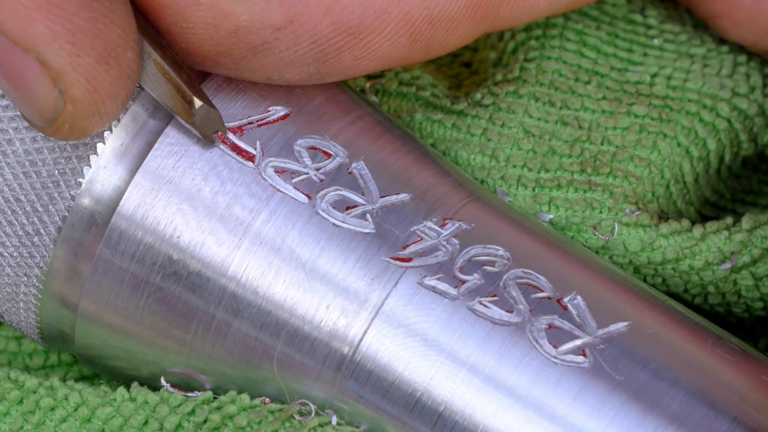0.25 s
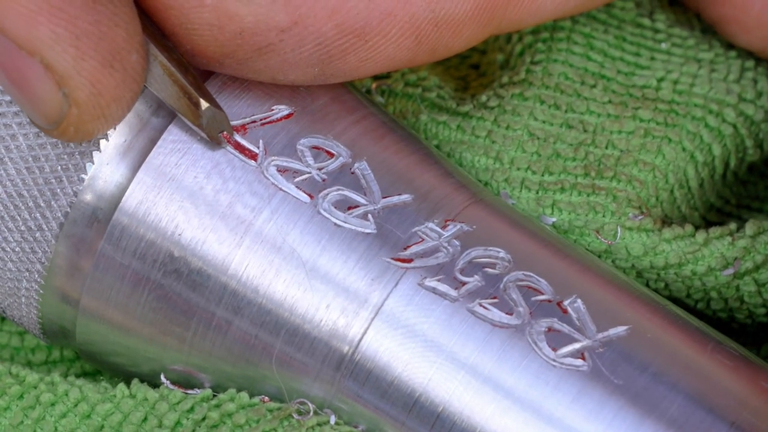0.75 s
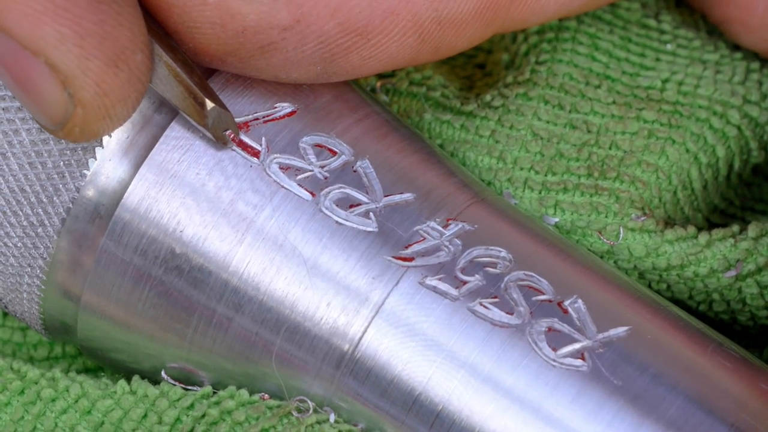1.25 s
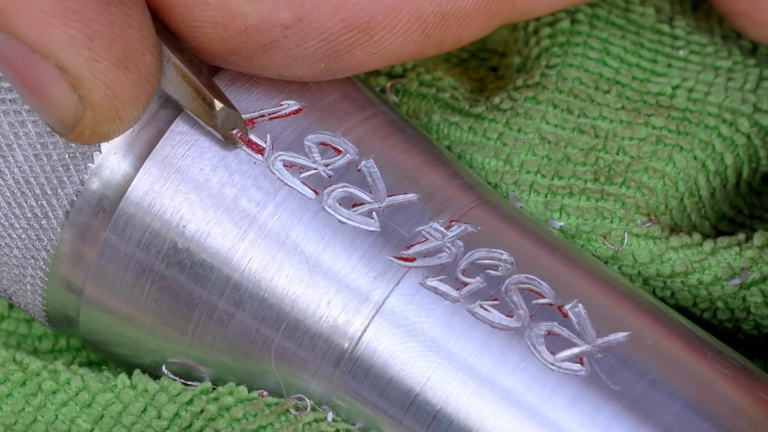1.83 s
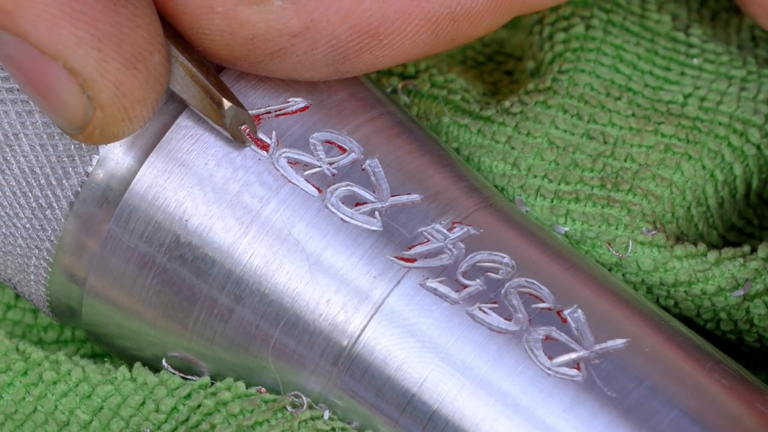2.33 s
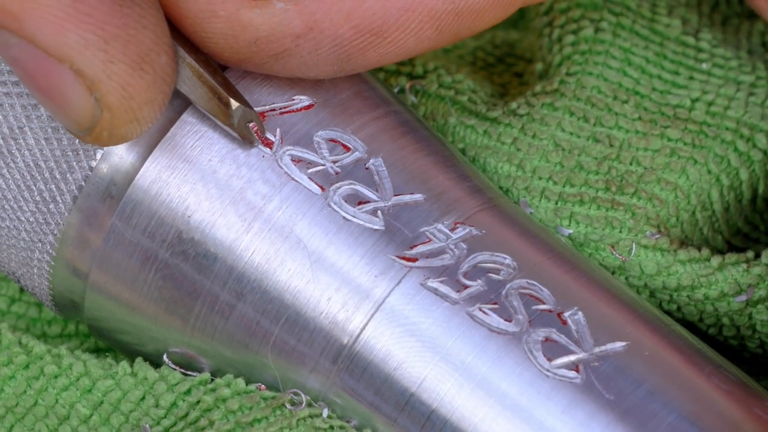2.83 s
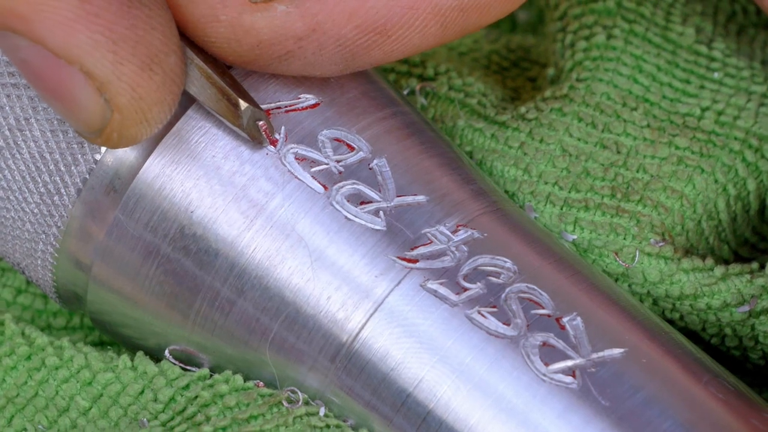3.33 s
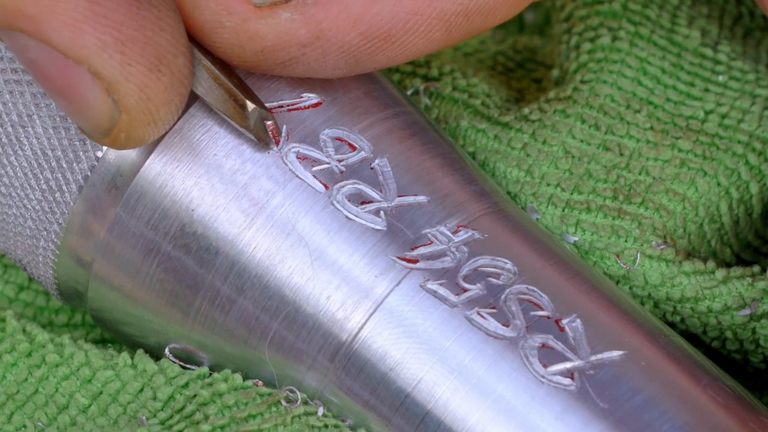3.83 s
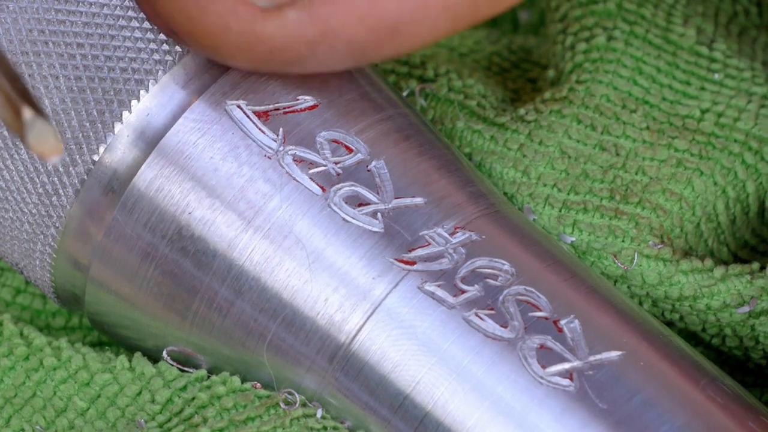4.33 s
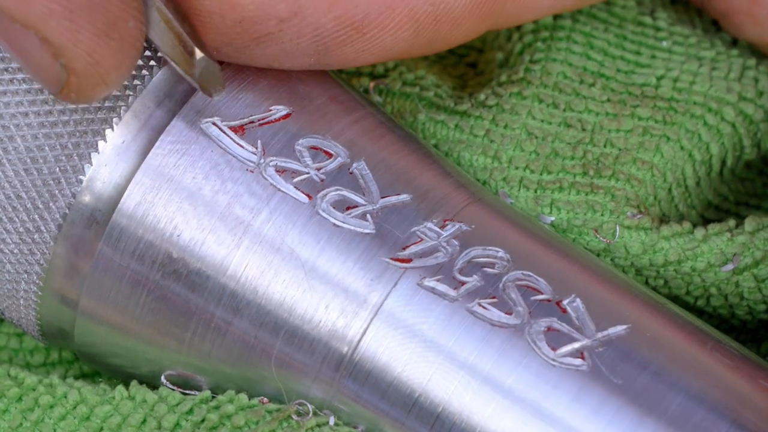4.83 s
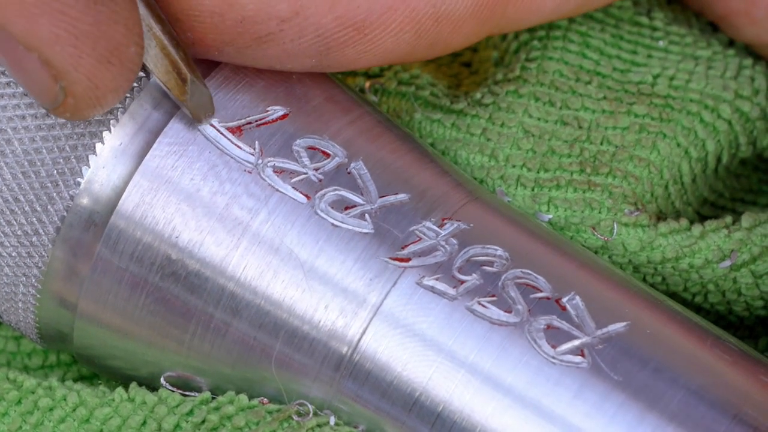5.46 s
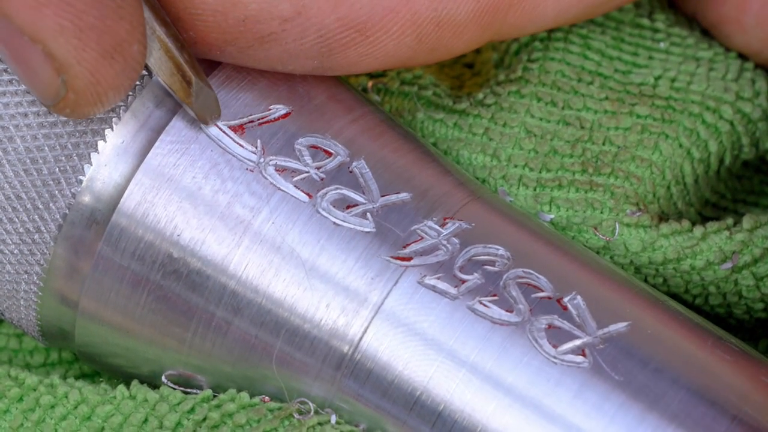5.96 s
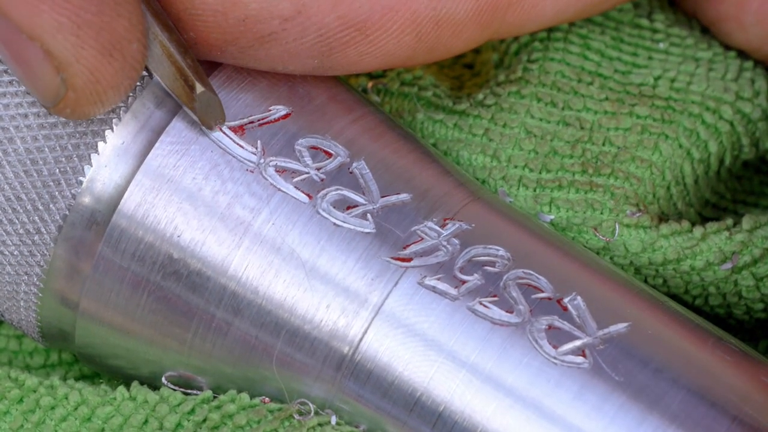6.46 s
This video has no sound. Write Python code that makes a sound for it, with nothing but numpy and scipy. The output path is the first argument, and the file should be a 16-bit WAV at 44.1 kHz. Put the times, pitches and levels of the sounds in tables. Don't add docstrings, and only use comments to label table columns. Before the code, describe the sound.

Close, continuous metallic chatter from a small engraving tool, rapid bright rattling blows over steady hiss, shifting in colour when the tip leaves the metal and bites again.

```python
import sys
import numpy as np
from scipy import signal
from scipy.fft import rfft, irfft
from scipy.io import wavfile
from scipy.ndimage import uniform_filter1d

SR = 44100
rng = np.random.default_rng(int(sys.argv[2]) if len(sys.argv) > 2 else 0)


def ratio_of_db(decibels):
    return 10 ** (np.asarray(decibels, float) / 20)


def generate_wav(sig):
    pcm = np.round(np.clip(np.atleast_2d(sig).T, -1, 1) * 32767).astype(np.int16)
    wavfile.write(sys.argv[1], SR, pcm)


N = 295029

BLOWS_PER_S = 27.148
BLOW_DB, RETURN_DB, TIP_HZ = -25.5, -44.5, 9290
LIFT_S, RECUT_S, SETTLE_S = 4.3, 4.81, 0.11
SLIDE_HZ, SLIDE_WIDTH_HZ = 11250, 350
BITE_HZ, BITE_WIDTH_HZ = 4920, 910
SHAKE_DB, SHAKE_SPREAD_DB = -85, 9.5
BURST_SAMPLES = 4096
HZ = np.fft.rfftfreq(BURST_SAMPLES, 1 / SR)

# frequency in Hz, level in dB.
BLOW_COLOUR = [(120, -31.5), (300, -25), (1600, -17.5), (2100, -8), (2560, -7), (2750, -14), (4300, -4.5),
               (5200, -5), (7400, -13.5), (8400, -5), (9300, 5.5), (10300, -5.5), (12500, -18),
               (15000, -17)]
# frequency in Hz, level in dB.
KNOCK_COLOUR = [(150, -26), (330, -10.5), (500, -7), (800, -11), (1150, -2.5), (1600, -13), (3000, -14),
                (6000, -42)]
# frequency in Hz, level in dB.
HISS_COLOUR = [(120, -36.5), (400, -16.5), (1600, -10), (2300, -1.5), (3000, -4.5), (4300, -2.5),
               (7200, -6), (9300, -2), (10800, -3), (15000, -10.5)]
# frequency in Hz, width in Hz, level over the broad colour in dB.
METAL_MODES = [(408, 40, -3), (580, 66, 3), (846, 9.7, -22), (1116, 15, -2), (1252, 21, 5), (2040, 68, 0.5),
               (2150, 100, -5.5), (2275, 60, 2.5), (2398, 45, 3), (2527, 23, 3), (2830, 20, -19),
               (3320, 134, -6.5), (13430, 240, 4.5), (3760, 59, 0), (4040, 29, -2), (4240, 183, -3),
               (4437, 110, 2.5), (4370, 31, -5), (8700, 730, -9.5), (9070, 200, -12)]
# frequency in Hz, left minus right in dB.
PORT_BALANCE = [(60, -0.5), (110, -1), (200, 0), (380, 0), (700, 2), (1290, 1.5), (2380, -0.5), (4400, 1),
                (8120, 0.0), (15000, -1.5)]
# time in seconds, piston lag behind a steady beat in ms,
# tip freedom in dB, tip ring in Hz.
HAND_PATH = [(0.0, -6.5, -1, 9280), (0.35, -6.0, 0.9, 9390), (0.7, -5.5, 0.2, 9330), (1.45, -6, -0.3, 9360),
             (1.75, -4, 0.1, 9430), (2.1, -6, -.3, 9390), (2.65, -6.8, 0.7, 9410), (2.9, -7.5, -0.1, 9220),
             (3.25, -8.5, -1.1, 9440), (3.5, -8, -1.4, 9305), (3.75, -5.5, -0.7, 9370),
             (4.2, -6.5, 0.4, 9290), (4.5, -4, 1.3, 9200), (4.85, -3.5, 1.1, 9245), (5.2, -5, .4, 9330),
             (5.6, -5.5, -.4, 9180), (6.0, -7.5, -.6, 9146), (6.69, -8, 0, 9290)]
# frequency in Hz,
# change in dB per dB of freedom, change in dB per 100 Hz of tip ring.
DAMPED_PARTS = [(4030, -1.7, -1.83), (4900, 0.1, -2), (2360, -2, -0.55)]
# frequency in Hz, width in Hz, change in dB.
LIFTED_MODES = [(4200, 1260, -7), (4350, 310, -5), (6040, 990, -8), (8160, 500, 5), (11800, 550, 7),
                (12900, 650, 6), (15400, 900, -13), (2380, 1000, -3.5)]
# frequency in Hz, width in Hz, change in dB.
NEW_CUT_MODES = [(3720, 550, -1), (4494, 365, -11), (6300, 1300, 0.5), (12900, 450, 8), (14800, 500, 1)]
# centre in seconds, length in seconds, change in dB.
FINGER_SLIDES = [
    (1.17, 0.15, 9),
    (1.72, 0.25, 10),
    (3.7, 0.89, -2.5),
    (5.35, 0.55, -1),
]
# centre in seconds, length in seconds, change in dB.
DEEP_BITES = [
    (5.04, .05, 9),
    (5.19, 0.045, 8),
    (5.37, .06, 15),
]
# centre in seconds, length in seconds, change in dB.
AIR_SURGES = [
    (.68, 0.11, -0.5),
    (1.3, 0.1, 0),
    (2.4, 0.11, -2.5),
    (3.11, 0.084, -8),
    (3.75, 0.85, 5.5),
    (4.7, 0.48, -0.5),
    (2.85, 0.28, 0.5),
    (5.6, 0.18, -10),
    (5.9, 0.068, -18),
    (6.45, .4, -2.5),
]
# start in seconds, level in dB.
BENCH_THUDS = [(0.187, -65), (0.332, -83.5), (0.781, -67), (0.997, -67), (1.442, -69), (1.846, -66),
               (2.034, -67), (2.615, -75), (2.869, -71), (3.931, -70), (4.386, -74), (4.504, -66),
               (4.906, -73), (5.497, -73), (6.157, -65), (6.269, -79), (6.42, -65), (6.559, -69),
               (6.599, -72)]


def blows(strokes_s, grip, bent_hz, bass_cut, damping):
    lead_s = 0.0012 * bump(HZ, 0, 2980)
    lead = np.exp(2j * np.pi * HZ * lead_s)
    colour = lead / np.sqrt(damping) * bass_cut * grip * ratio_of_db(read(BLOW_COLOUR, bent_hz) + 1.5)
    return spray(strokes_s, colour, rise_ms=4.02, fall_ms=3.7, square=1.45, even=0.35, alike=0.71, turn_hz=300,
                 patch_db=2.09, patch_hz=954, fine_db=1.67, rattle_db=2.5)


def return_knocks(strokes_s, bass_cut):
    level_db = RETURN_DB + swells(AIR_SURGES, strokes_s) + read(KNOCK_COLOUR, HZ) + 9
    return spray(strokes_s - 0.0145, bass_cut * ratio_of_db(level_db), rise_ms=8.5, fall_ms=12.0, square=2.06,
                 even=0.13, alike=0.85, turn_hz=1495, patch_db=3.0, patch_hz=610, fine_db=2.93, rattle_db=2.5)


def shop_hiss(strokes_s, grip, bent_hz, bass_cut, damping):
    smeared_grip = np.sqrt(grip * grip.mean(axis=0))
    colour = damping * bass_cut * smeared_grip * ratio_of_db(read(HISS_COLOUR, bent_hz) - 11.5)
    return spray(strokes_s, colour, rise_ms=6.4, fall_ms=19.4, square=1.35, even=0.15, alike=0.75, turn_hz=300,
                 patch_db=4.5, patch_hz=505, fine_db=2.27, rattle_db=0.4)


def bench_thuds(strokes_s):
    shakes_db = SHAKE_DB + SHAKE_SPREAD_DB * np.minimum(rng.standard_normal(len(strokes_s)), 1.1)
    shakes_db = shakes_db + 2.0 * swells(AIR_SURGES, strokes_s)[:, 0]
    events = [(s + 0.0224, db + 11.5) for s, db in BENCH_THUDS]
    events += list(zip(strokes_s[1:-1], shakes_db[1:]))
    push = np.zeros((2, N))
    for s, db in events:
        push[:, min(round(s * SR), N - 1)] += ratio_of_db(db) * rng.choice([-1, 1], 2)
    t_s = np.arange(-600, 600) / SR
    left = signal.oaconvolve(push[0], np.exp(-(t_s / 0.0022) ** 2), "same")
    right = signal.oaconvolve(push[1], np.exp(-(t_s / 0.0026) ** 2), "same")
    return np.array([left * 1.3, np.roll(right, round(0.0025 * SR)) * 1.5])


def spray(strokes_s, colour, rise_ms, fall_ms, square, even, alike, turn_hz,
          patch_db, patch_hz, fine_db, rattle_db):
    count = len(strokes_s)
    t_ms = (np.arange(BURST_SAMPLES) - BURST_SAMPLES // 4) / SR * 1000
    shape = np.exp(-abs(t_ms / np.where(t_ms < 0, rise_ms, fall_ms)) ** square)
    rattle = uniform_filter1d(rng.standard_normal((count, 1, BURST_SAMPLES)), size=60)
    rattle = uniform_filter1d(rattle, size=40)
    shape = shape * ratio_of_db(2 * rattle_db * np.tanh(rattle / rattle.std() / 2))
    z = rfft(rng.standard_normal((count, 3, BURST_SAMPLES)) * shape)
    turn = np.angle(field(count, turn_hz, 3.1) + 1j * field(count, turn_hz, 3.0))
    turn = turn * np.array([[0.5], [-0.5]])
    alike = np.clip(alike, 0, 1)
    z = alike * z[:, :1] * np.exp(1j * turn) + np.sqrt(1 - alike ** 2) * z[:, 1:]
    z = z / abs(z) ** np.clip(even, 0, 0.9)
    z = z / np.sqrt(uniform_filter1d(abs(z) ** 2, size=80))
    patches_db = patch_db * field(count, patch_hz, 0.13) + fine_db * field(count, 120, 12.0)
    sides = ratio_of_db(read(PORT_BALANCE, HZ) * np.array([[0.5], [-0.5]]))
    spectrum = z * colour[:, None] * ratio_of_db(patches_db) * sides * metal()
    bursts = irfft(spectrum) * np.sqrt(BURST_SAMPLES)
    out = np.zeros((2, N + 3 * BURST_SAMPLES))
    starts = np.round(strokes_s * SR).astype(int) + BURST_SAMPLES * 3 // 4
    for at, burst in zip(starts, bursts):
        out[:, at:at + BURST_SAMPLES] += burst
    return out[:, BURST_SAMPLES:BURST_SAMPLES + N]


def metal():
    response = 1 + sum(ratio_of_db(db) / (1 + 2j * (HZ - hz) / width_hz) for hz, width_hz, db in METAL_MODES)
    return abs(response) * np.exp(0.4j * np.angle(response))


def hold(strokes_s):
    free_db, tip_hz = column(HAND_PATH, strokes_s).T[1:, :, None]
    db = BLOW_DB + free_db
    db = db + swells(FINGER_SLIDES, strokes_s) * bump(HZ, SLIDE_HZ, SLIDE_WIDTH_HZ)
    db = db + swells(DEEP_BITES, strokes_s) * bump(HZ, BITE_HZ, BITE_WIDTH_HZ)
    for hz, by_free, by_tip in DAMPED_PARTS:
        db = db + (by_free * free_db + by_tip * (tip_hz - TIP_HZ) / 100) * bump(HZ, hz, 0.32 * hz)
    lifted = 0.5 + 0.5 * np.tanh((strokes_s[:, None] - LIFT_S) / SETTLE_S)
    cutting = 0.5 + 0.5 * np.tanh((strokes_s[:, None] - RECUT_S) / SETTLE_S)
    for share, modes in ((lifted - cutting, LIFTED_MODES), (cutting, NEW_CUT_MODES)):
        db = db + share * sum(mode_db * bump(HZ, hz, width_hz) for hz, width_hz, mode_db in modes)
    return ratio_of_db(db), HZ - (tip_hz - TIP_HZ) * bump(HZ, TIP_HZ, 4000)


def field(strokes, width_hz, memory):
    width = max(round(width_hz / HZ[1]), 1)
    keep = np.exp(-1 / memory)
    fresh = uniform_filter1d(rng.standard_normal((strokes + 20, len(HZ))), width) * np.sqrt(width)
    return signal.lfilter([np.sqrt(1 - keep ** 2)], [1, -keep], fresh, axis=0)[20:, None]


def swells(events, s):
    return sum(db * bump(s, at, length) for at, length, db in events)[:, None]


def bump(x, centre, width):
    return np.exp(-(2 * (x - centre) / width) ** 2)


def read(points, hz):
    f, value = np.transpose(points)
    return np.interp(np.log(hz + 1), np.log(f + 1), value)


def column(rows, s):
    rows = np.array(rows)
    return np.array([np.interp(s, rows[:, 0], c) for c in rows[:, 1:].T]).T


def scene():
    beat_s = np.arange(0, N / SR * BLOWS_PER_S + 1) / BLOWS_PER_S
    strokes_s = beat_s + column(HAND_PATH, beat_s)[:, 0] / 1000
    grip, bent_hz = hold(strokes_s)
    bass_cut = 1 / np.sqrt(1 + (135 / (HZ + 1)) ** 12)
    damping = ratio_of_db(-3 * np.clip((HZ - 5000) / 7000, 0, 1))
    mix = blows(strokes_s, grip, bent_hz, bass_cut, damping)
    mix = mix + return_knocks(strokes_s, bass_cut)
    mix = mix + shop_hiss(strokes_s, grip, bent_hz, bass_cut, damping)
    return mix + bench_thuds(strokes_s)


def band_limit(x):
    return signal.sosfilt(signal.butter(12, 16000, fs=SR, output="sos"), x)


def record(dry):
    hz = np.fft.rfftfreq(N, 1 / SR)
    dip_db = -6 * bump(hz, 15480, 220) - 3 * bump(hz, 15760, 250)
    edge_db = -70 * np.clip((hz - 15740) / 190, 0, 1) ** 2
    mix = irfft(rfft(dry) * ratio_of_db(dip_db + edge_db), N)
    return band_limit(mix)


dry = scene()
out = record(dry)
generate_wav(out)
```